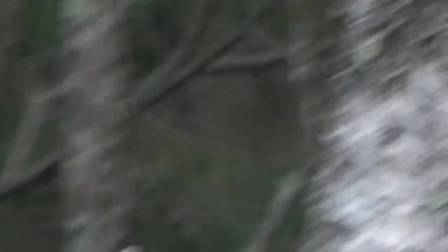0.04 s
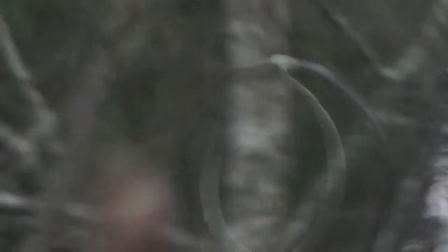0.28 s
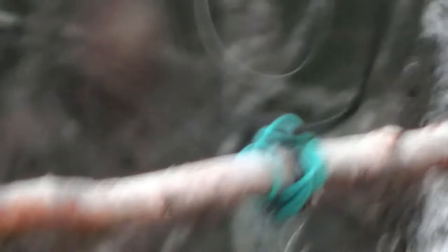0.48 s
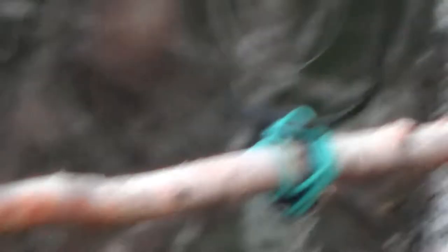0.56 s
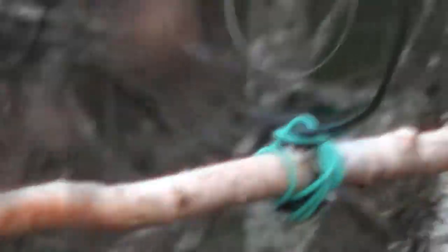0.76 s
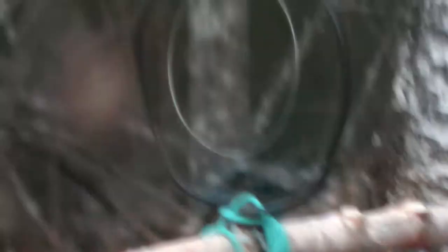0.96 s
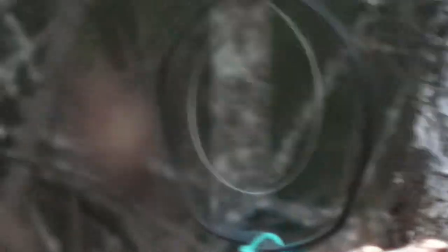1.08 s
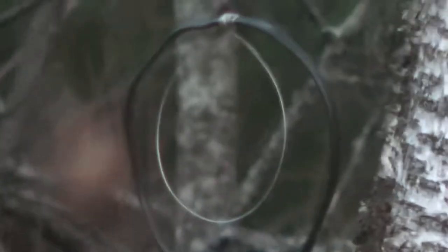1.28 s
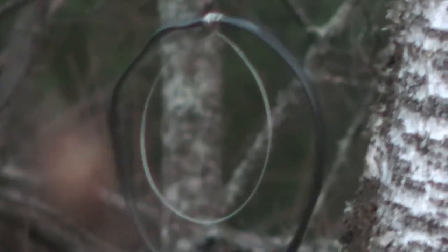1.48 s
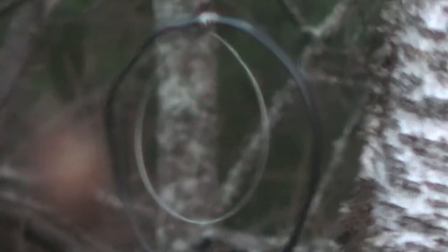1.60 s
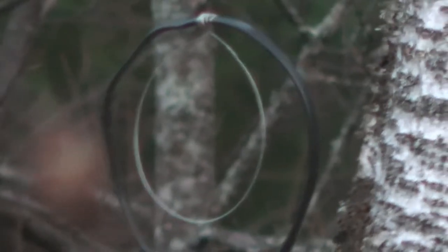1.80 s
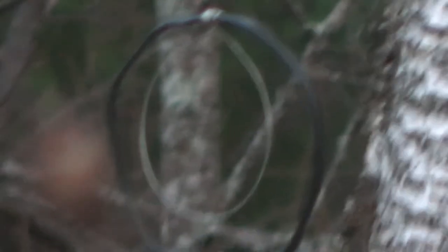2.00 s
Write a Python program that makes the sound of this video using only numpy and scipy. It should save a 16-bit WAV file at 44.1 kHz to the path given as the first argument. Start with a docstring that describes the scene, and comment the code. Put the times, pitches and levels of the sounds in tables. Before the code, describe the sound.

Someone fumbles with a camera in a quiet forest: knocks, low rumble and short scrapes, then stillness

```python
"""In a quiet forest, someone shifts about with a camera in hand, then stands still.
Air and microphone hiss steadily, with a faint whine; the moving grip adds a low rumble.
Jolts thump the camera body and clack its shell, as pushes and taps that set decaying tones ringing.
Random tiny clicks make a short dry rustle; a small loose part rings thinly.
Late on, three quick clicks make one tiny snap."""
import sys
import numpy as np
from scipy import signal
from scipy.fft import rfft, irfft
from scipy.io import wavfile

SR = 44100
rng = np.random.default_rng(int(sys.argv[2]) if len(sys.argv) > 2 else 0)


def bounce(signal):
    """Save signal as a 16-bit WAV file at the path given by the first command-line argument."""
    frames = np.transpose(np.atleast_2d(signal))
    limited = np.clip(frames, -1, 1)
    pcm = np.round(limited * 32767).astype(np.int16)
    wavfile.write(sys.argv[1], SR, pcm)


N = 90404
T = np.arange(N) / SR  # time of each sample, in seconds

# In the colour tables only the shape counts: the overall level is evened out later.
# Colour of the hiss that both ears share: (frequency [Hz], relative level per Hz [dB])
HISS_SHARED = [(15, -5), (34, 4.5), (55, -4), (90, -2.5), (128, -14), (250, -10), (700, -11.5), (1100, -14),
               (4000, -18.5), (8000, -21), (12500, -25), (15700, -28.5)]
# Colour of the hiss that is opposite in the two ears: (frequency [Hz], relative level per Hz [dB])
HISS_OPPOSED = [(20, -20), (60, -6), (130, -2.5), (220, 2), (620, 0.5), (1100, -3), (4000, -11.5),
                (8000, -14.5), (12500, -19), (15700, -26)]
HISS_SHARED_DB, HISS_OPPOSED_DB = -58.5, -57
WHINE_HZ, WHINE_BEAT_HZ, WHINE_PEAK_DB = 7812.5, 25, -82

# Loudness of the grip's rumble over time: (time [s], level [dB])
GRIP_LEVEL = [(0, -52), (0.15, -52.5), (0.36, -47), (0.48, -65.5), (0.74, -64), (0.85, -48.5), (0.91, -56),
              (1.07, -48.5), (1.18, -62.5), (1.45, -68), (2.05, -75)]
# Colour of that rumble: (frequency [Hz], relative level per Hz [dB])
GRIP_COLOUR = [(20, -2.5), (42, 9.5), (60, -2.5), (92, 5.5), (140, -8), (260, -10), (450, -40)]

# Jolts to the camera: (time [s], thump strength [dB], width of the soft push [ms],
# clack strength [dB], pitch of the clack [Hz], lean: up on the left and down on the right [dB])
JOLTS = [(0.006, -42, 0.57, -38, 300, 3), (0.011, -56, 3.6, -42.5, 400, -1),
         (0.0906, -28.5, 1, -24.5, 970, -0.5), (0.0941, -27.5, 0.66, -30, 334, 0),
         (0.098, -33, 0.5, -45, 400, -3), (0.106, -21.5, 1.4, -36.5, 440, 9),
         (0.122, -39.5, 0.67, -43, 300, 2), (0.174, -36.5, 1.6, -65, 300, 0),
         (0.192, -30.5, 0.82, -33, 353, -0.5), (0.207, -12.5, 1.08, -31.5, 342, 4.5),
         (0.2167, -10.5, 1.48, -36.5, 456, -2), (0.3119, -10.5, 1.046, -28.5, 335, 3),
         (0.3252, -7.5, 1.114, -24, 473, 2), (0.381, -40.5, 1.1, -58, 400, -2),
         (0.812, -15.5, 1.066, -25.5, 540, 3), (0.843, -28, 3.2, -57, 500, -8),
         (0.972, -35.5, 0.67, -34.5, 282, 3), (1.0291, -10.5, 0.91, -11.5, 356, 0),
         (1.0295, -53, 1.1, -26.5, 720, 3), (1.074, -37, 2.4, -57, 300, -5),
         (1.135, -28, 2.1, -58, 350, 8.5), (1.381, -36, 2.1, -56, 350, 4)]
# Ringing tones of the camera body: (frequency [Hz], relative level [dB], time to fall 60 dB [s])
BODY_TONES = [(95.2, 1.5, 0.057), (168.2, 3.5, 0.0314), (240.2, 4.5, 0.0342)]
# Ringing tones of the shell: (frequency [Hz], relative level [dB], time to fall 60 dB [s])
SHELL_TONES = [(301.3, 3, 0.057), (422, 0, 0.023), (482, -11, 0.029), (571, -11, 0.052), (696, -2.5, 0.033),
               (787, -7.5, 0.042), (965, -7, 0.054), (1345, -3.5, 0.032), (1530, -13, 0.04),
               (1890, -18, 0.044)]
BASS_CUT_HZ, BODY_LEAD_RAD, SHELL_LEAD_RAD = 94.6, 0.17, 1.96

# Rustling strokes: (time of the peak [s], rise [s], decay [s], scrape level [dB], crackle level [dB])
STROKES = [(0.075, 0.064, 0.02, -57.5, -70), (0.195, 0.011, 0.012, -49.5, -65),
           (0.22, 0.003, 0.012, -53, -57.5), (0.326, 0.0076, 0.011, -45, -58),
           (0.335, 0.001, 0.003, -60, -49), (0.658, 0.0042, 0.017, -42, -63),
           (0.696, 0.018, 0.012, -50, -55.5), (0.743, 0.0093, 0.032, -55, -57.5),
           (0.79, 0.015, 0.014, -47, -61), (0.813, 0.002, 0.0086, -52, -53),
           (0.835, 0.023, 0.033, -47, -69), (0.866, 0.031, 0.027, -48, -59.5),
           (0.9, 0.009, 0.022, -55.5, -57.5), (1.292, 0.003, 0.015, -74, -60)]
# Colour of the dull scrape: (frequency [Hz], relative level per Hz [dB])
SCRAPE_COLOUR = [(100, -13), (300, 6), (600, -6), (1000, -1), (1350, 2.5), (1800, -8), (2400, -17),
                 (5000, -20), (16000, -47)]
# Colour of the fine crackle: (frequency [Hz], relative level per Hz [dB])
CRACKLE_COLOUR = [(500, -30), (2200, -7), (3000, -1.5), (3900, -0.5), (4600, -6), (6500, -9), (9000, -25),
                  (16000, -39)]
SCRAPES_PER_S, CRACKLES_PER_S = 2200, 1000  # average grains per second
GRAIN_SPREAD_DB, SCRAPE_LEAN_DB = 3.5, 2

# Thin rings of a small loose part: (time of the peak [s], half length [s], level [dB], frequency [Hz])
LOOSE_RINGS = [(0.076, 0.012, -60, 3980), (0.123, 0.0059, -64, 4100), (0.223, 0.006, -58, 4110),
               (0.329, 0.0044, -52.5, 4150), (0.338, 0.0021, -60, 3680), (0.816, 0.0038, -51, 4030),
               (0.7, 0.039, -67.5, 4030), (0.87, 0.026, -64.5, 4050), (1.386, 0.007, -62, 3820)]
RING_HALF_WIDTH_HZ = 95

# Clicks of the snap: (time [s], strength [dB])
SNAP_CLICKS = [(1.287, -41), (1.2885, -38.5), (1.2884, -51)]
# Ringing tones of the snap: (frequency [Hz], relative level [dB], time to fall 60 dB [s])
SNAP_TONES = [(7400, 4, 0.0055), (8200, 6, 0.003), (11100, 7.5, 0.0015), (14800, 2, 0.002)]
SNAP_LEAD_RAD = 1.0

EDGE_HZ = 15780  # top of the recorder's range


def amp(db):
    """Turns decibels into a gain."""
    return 10 ** (np.asarray(db) / 20)


def unit(x):
    """Scales a sound to an average strength (rms) of 1."""
    return x / np.sqrt(np.mean(x ** 2) + 1e-20)


def colour(x, points):
    """Reshapes the balance of low and high frequencies, then scales to rms 1."""
    hz, db = np.transpose(points)
    f = np.fft.rfftfreq(N, 1 / SR)
    # adding 1 keeps the logarithm safe at 0 Hz
    level_db = np.interp(np.log(f + 1), np.log(hz + 1), db)
    return unit(irfft(rfft(x) * amp(level_db), N))


def hiss():
    """Wide steady hiss of still air and microphone, with a faint electronic whine that beats."""
    shared = amp(HISS_SHARED_DB) * colour(rng.standard_normal(N), HISS_SHARED)
    opposed = amp(HISS_OPPOSED_DB) * colour(rng.standard_normal(N), HISS_OPPOSED)
    beat = np.cos(np.pi * WHINE_BEAT_HZ * T)  # each half turn is one swell
    whine = amp(WHINE_PEAK_DB) * np.sin(2 * np.pi * WHINE_HZ * T) * beat
    return np.array([shared + opposed, shared - opposed]) + whine


def grip():
    """Low rumble of the moving grip: noise that rises and falls, then fades as the hand comes to rest."""
    rumble = colour(rng.standard_normal(N), GRIP_COLOUR)
    low = signal.sosfilt(signal.butter(4, 600, fs=SR, output="sos"), rumble)
    level_db = np.interp(T, *np.transpose(GRIP_LEVEL))
    return amp(level_db) * low


def pan(db):
    """Gains that lean a sound to the left: left up, right down by the same amount."""
    return amp([[db], [-db]])


def ring(drive, tones, lead):
    """Sets fading tones ringing; the left ear's wave leads the right by an angle in radians."""
    t = T[:N // 8]
    turn = sum(amp(db - 60 * t / t60) * np.exp(2j * np.pi * hz * t) for hz, db, t60 in tones)
    turn /= np.sqrt(sum(amp(db) ** 2 for _, db, _ in tones))
    half_lead = .5j * lead * np.array([[1], [-1]])
    ears = (turn * np.exp(half_lead)).real
    return signal.fftconvolve(np.atleast_2d(drive), ears, axes=1)[:, :N]


def push(s, width):
    """A smooth bell-shaped push whose samples add up to 1."""
    shape = np.exp(-.5 * ((T - s) / width) ** 2)
    return shape / (shape.sum() + 1e-20)


def tap(s, hz):
    """A hard contact that pushes and lets go, strongest near a pitch."""
    u = (T - s) * 2 * np.pi * hz
    return -u * np.exp(-.5 * u ** 2) * hz / SR * np.sqrt(2 * np.pi * np.e)


def jolts():
    """A soft push thumps the body; a harder contact clacks the shell, often more on one side."""
    soft = sum(amp(db) * push(s, ms / 1000) for s, db, ms, *_ in JOLTS)
    hard = sum(pan(lean_db) * amp(db) * tap(s, hz) for s, _, _, db, hz, lean_db in JOLTS)
    thump = ring(-2 * soft, BODY_TONES, BODY_LEAD_RAD)
    clack = ring(-hard, SHELL_TONES, SHELL_LEAD_RAD)
    bass_cut = signal.butter(2, BASS_CUT_HZ, "high", fs=SR, output="sos")
    return signal.sosfilt(bass_cut, thump + clack)


def grains(rate):
    """Random tiny clicks of uneven size, different in each ear."""
    size = amp(GRAIN_SPREAD_DB * np.minimum(rng.exponential(1, (2, N)), 4))
    sign = rng.choice([-1, 1], (2, N))
    present = rng.random((2, N)) < rate / SR
    return size * sign * present


def rustle():
    """A dull scrape and a finer dry crackle, both made of grains under strokes that swell and die."""
    s, rise, decay, scrape_db, crackle_db = np.transpose(STROKES)[:, :, None]
    stroke = np.exp(-np.minimum(np.maximum((s - T) / rise, (T - s) / decay), 20))
    # strokes that overlap add as energy
    scrape_level = np.linalg.norm(amp(scrape_db) * stroke, axis=0)
    crackle_level = np.linalg.norm(amp(crackle_db) * stroke, axis=0)
    scrape = scrape_level * colour(grains(SCRAPES_PER_S), SCRAPE_COLOUR)
    crackle = crackle_level * colour(grains(CRACKLES_PER_S), CRACKLE_COLOUR)
    return pan(SCRAPE_LEAN_DB) * scrape + crackle


def loose_part():
    """A small loose part rings thinly: slow noise moved up to a high pitch, in brief swells."""
    smooth = signal.butter(2, RING_HALF_WIDTH_HZ, fs=SR, output="sos")
    a, b = signal.sosfilt(smooth, rng.standard_normal((2, N)))
    shake = unit(a) + 1j * unit(b)
    out = np.zeros(N)
    for s, half, db, hz in LOOSE_RINGS:
        swell = np.exp(-.5 * ((T - s) / half) ** 2)
        tone = (shake * np.exp(2j * np.pi * hz * T)).real
        out += amp(db) * swell * tone
    return out


def snap():
    """Something tiny and dry breaks in three quick clicks, each ringing high tones."""
    clicks = np.zeros(N)
    for s, db in SNAP_CLICKS:
        clicks[round(s * SR)] += amp(db)
    return ring(clicks, SNAP_TONES, SNAP_LEAD_RAD)


def scene():
    """Adds up all the sources at the microphone."""
    return hiss() + grip() + jolts() + rustle() + loose_part() + snap()


def record(dry):
    """The recorder's limit: a steep filter removes the highest frequencies."""
    low_pass = signal.firwin(511, EDGE_HZ, window=("kaiser", 9), fs=SR)
    return signal.oaconvolve(dry, low_pass[None], "same")


dry = scene()
out = record(dry)
bounce(out)
```